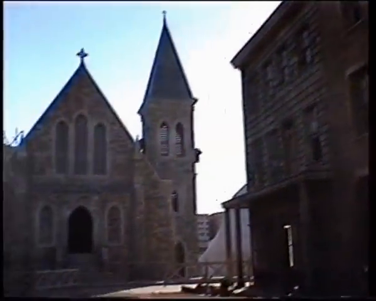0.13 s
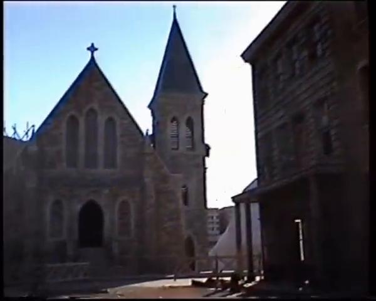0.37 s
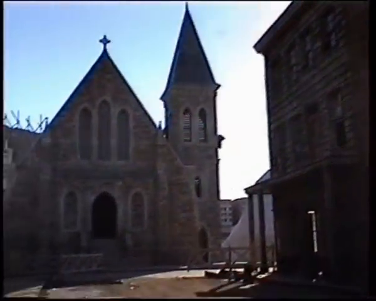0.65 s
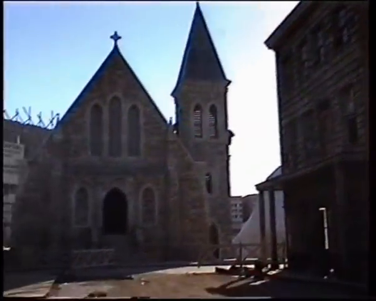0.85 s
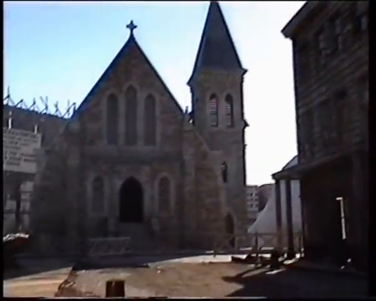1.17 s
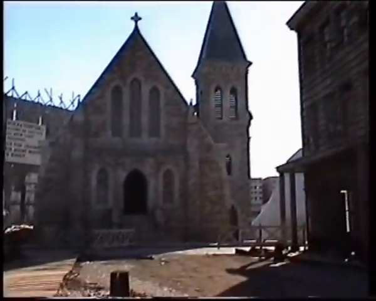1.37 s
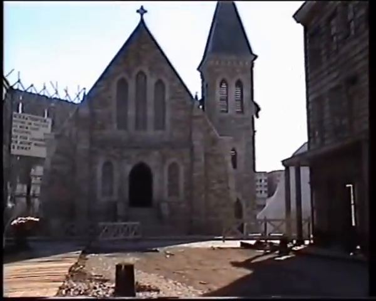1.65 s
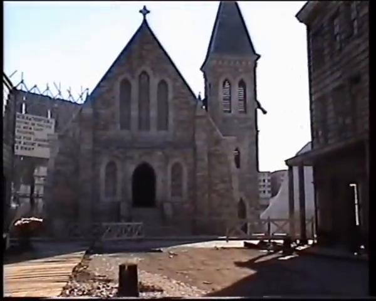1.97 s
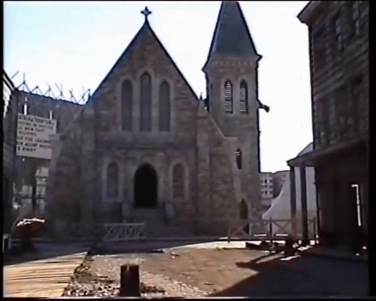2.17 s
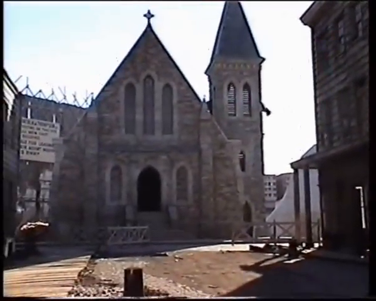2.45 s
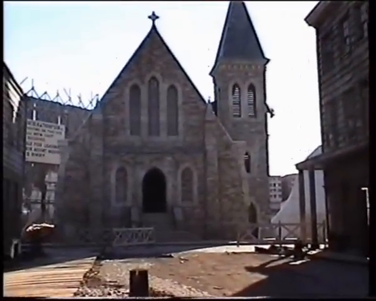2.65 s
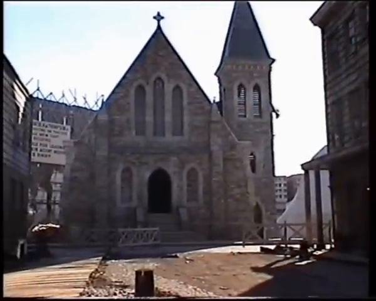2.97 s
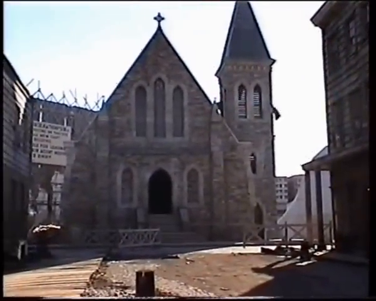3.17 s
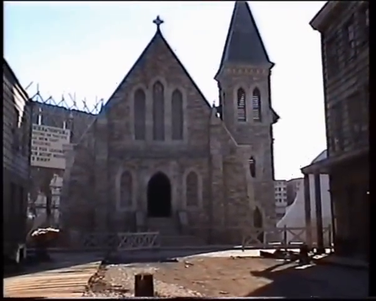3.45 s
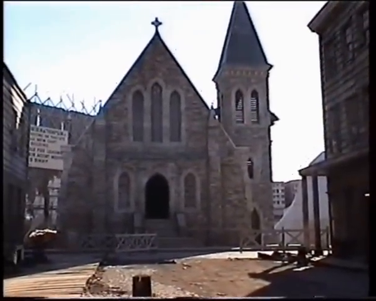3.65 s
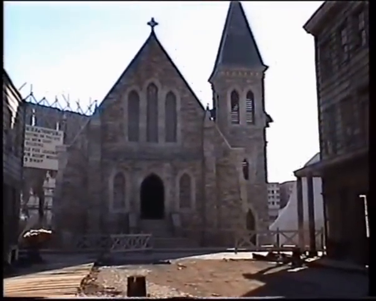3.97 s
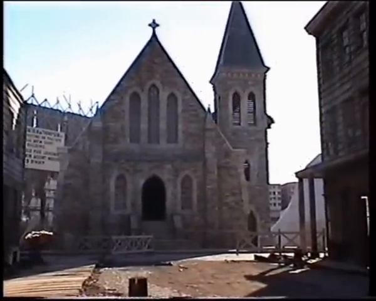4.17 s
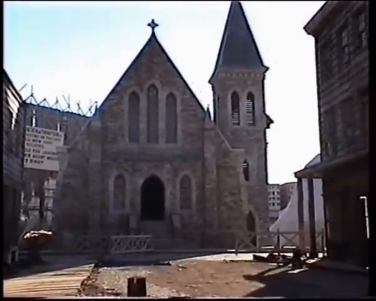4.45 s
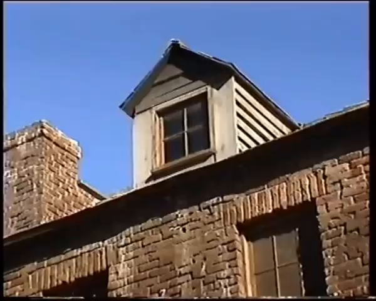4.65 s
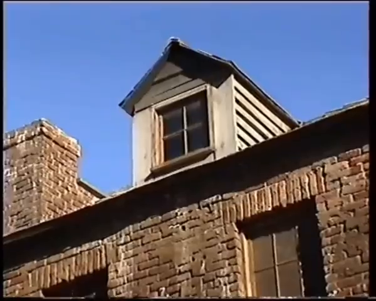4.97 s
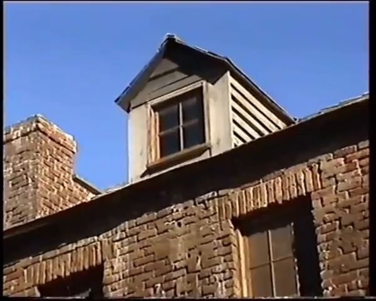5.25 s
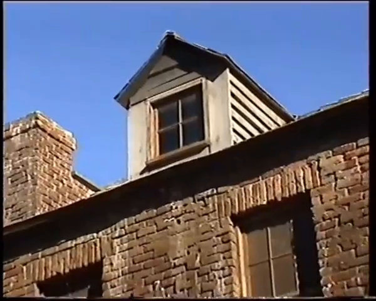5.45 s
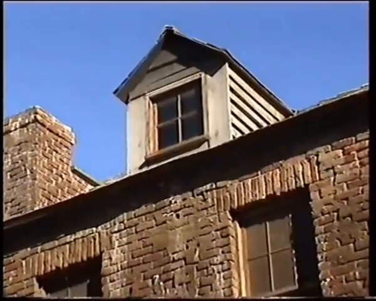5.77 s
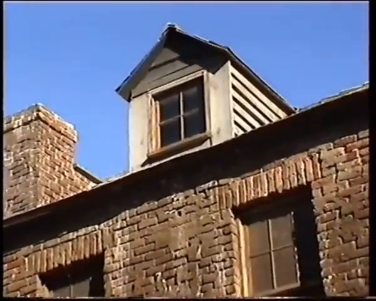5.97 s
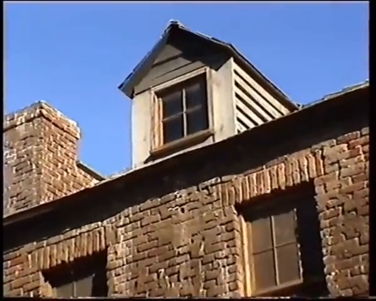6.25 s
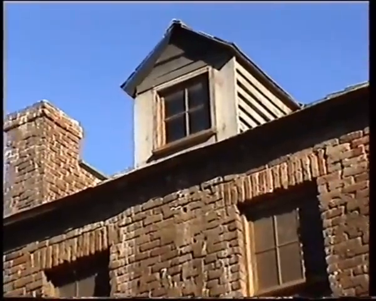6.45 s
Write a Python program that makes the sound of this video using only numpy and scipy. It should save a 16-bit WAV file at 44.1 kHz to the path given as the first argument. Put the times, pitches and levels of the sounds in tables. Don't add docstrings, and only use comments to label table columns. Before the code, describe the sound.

From 0 to 6.6 seconds a hard-edged electrical interference buzz runs without pause, pitch fixed near 217 hertz, rich in buzzy harmonics, slightly grainy and flickering, with tiny regular ticks of irregularity. It starts a little weaker and firms up by 1.3 seconds. It lies on the left; only thin, watery treble reaches the right. Under it is a faint distant outdoor hush. Wind makes low muffled bumps around 0.6 to 0.8 and 1.1 to 1.4 seconds, a small flutter at 2.3, puffs from 3.0 to 3.4, and a firmer knock and rumble at 3.6 to 3.9. At about 4.6 the scene cuts and the buzz changes colour. Gusts thicken, with pops at 5.35 to 5.6, then heavy overloading thumps at 5.8 to 6.0 and 6.15 to 6.3, briefly ducking the buzz. A last puff comes at 6.55. Close, dry, band-limited microphone, no echo.

```python
import sys
import numpy as np
from scipy import signal
from scipy.fft import rfft, irfft, dct, next_fast_len
from scipy.io import wavfile
from scipy.ndimage import uniform_filter1d, map_coordinates

SR = 44100
rng = np.random.default_rng(int(sys.argv[2]) if len(sys.argv) > 2 else 0)


def gain_from_db(level_db):
    decades = np.asarray(level_db, float) / 20
    return 10 ** decades


def dump_mix(stems):
    frames = np.atleast_2d(stems).T
    limited = np.clip(frames, -1, 1)
    pcm = np.round(limited * 32767).astype(np.int16)
    wavfile.write(sys.argv[1], SR, pcm)


N = 291879

SCENE_CHANGE_S = 4.625
FRAME_HZ = 650 / 3
SLOT_HZ = 8 * FRAME_HZ
GUARD = 0.052
GUST_RISE_DB_PER_S, GUST_FALL_DB_PER_S, SWAY_DB_PER_S = 700.5, 600, 351
SOFT_EDGE_DB = -19
BLOCK, OFFSET = 1024, 922

# f/Hz, density/dB
HUSH = [(60, -22.5), (150, -3), (400, -6.5), (900, -13), (1800, -6.5), (2600, -21.5), (3400, -43),
        (5000, -51.5)]
# f/Hz, density/dB
DEEP = [(12, -27), (20, -11), (30, 1), (42, 14), (55, -20), (70, -48)]
# f/Hz, density/dB
RUMBLE = [(45, -25), (62, -10), (90, 0.5), (130, 0), (200, -7), (285, -15.5), (400, -29.5), (600, -49)]
# f/Hz, density/dB
FLUTTER = [(120, -33), (200, -2), (300, 0), (450, -8.5), (800, -23), (1500, -27), (2200, -38.5),
           (3500, -60)]
# t/s, level/dB
BREEZE = [(0, -5), (0.45, 3.5), (1.0, 2), (1.5, -3), (2.0, 0), (2.7, -2), (3.0, 4), (3.25, -2), (3.5, 4.5),
          (4.15, 6), (4.4, -2), (4.6, 7.5), (5.7, 9), (6.1, 6), (6.62, 5)]
BREEZE_GROWS = (1, 0.8, 0.35)
CALM_DB = (-56.5, -50.5, -53)
# t/s, hold/s, rumble level/dB, flutter level/dB
GUSTS = [(0.55, 0.023, -49.5, -60), (0.653, 0.056, -38, -44), (0.773, 0.017, -37.5, -53),
         (1.115, .14, -34.5, -49), (1.293, .02, -41, -35), (1.346, 0.017, -39, -62),
         (1.433, 0.038, -56, -39), (2.298, 0.046, -54, -31.5), (2.988, 0.026, -44.5, -54),
         (3.364, .04, -39, -50), (3.635, 0.022, -27, -32), (3.724, .18, -33.5, -43.5),
         (3.987, 0.064, -39.5, -64), (4.191, 0.014, -37.5, -41), (4.279, 0.05, -43.5, -44),
         (4.56, 0.016, -41.5, -51), (4.652, 0.035, -33.5, -49), (4.74, .02, -39, -55),
         (4.83, 0.021, -37, -60), (5.018, 0.097, -34, -44), (5.209, 0.09, -38, -40),
         (5.327, 0.071, -37.5, -45), (5.506, 0.011, -30, -21.5), (5.574, .025, -34.5, -28),
         (5.726, 0.071, -36, -33), (5.847, 0.088, -24.5, -13), (5.984, .04, -39, -33),
         (6.148, 0.037, -27.5, -14), (6.202, .155, -35.5, -27.5), (6.543, 0.017, -32, -22.5)]
# t/s, level/dB
SWAYS = [(0.53, -45), (0.721, -41), (0.83, -45), (1.14, -31), (1.29, -39.5), (3.04, -42), (3.39, -41),
         (3.65, -24), (3.72, -32), (3.78, -35), (3.94, -39), (4.16, -47), (4.72, -32), (4.88, -38),
         (5.07, -33), (5.23, -41), (5.29, -39), (5.4, -36), (5.51, -45), (5.64, -32), (6.41, -41)]
# t/s, peak level/dB, f/Hz, length/s
PUFFS = [(1.088, -27, 116, 0.032), (1.238, -30, 146, 0.0074), (1.278, -31.5, 109, 0.037),
         (1.354, -51, 125, 0.023), (2.304, -44, 236, 0.021), (3.226, -28, 336, 0.007),
         (3.899, -28, 118, 0.014), (4.658, -32.5, 113, 0.018), (5.075, -30, 86, 0.032),
         (5.781, -18.5, 173, 0.019), (5.841, -8, 147.5, 0.026), (5.908, -9, 218, 0.013),
         (5.939, -18, 115, 0.0064), (5.983, -19.5, 161, 0.025), (5.988, -23, 221, 0.015),
         (6.022, -26, 240, 0.0077), (6.144, -10.5, 225, 0.025), (6.177, -18, 209, 0.031),
         (6.192, -25, 258, 0.018), (6.302, -24.5, 283, 0.025), (6.544, -19.5, 283, 0.009)]
# t/s, peak level/dB, f/Hz, length/s, edge level/dB
POPS = [(3.634, -24, 87, 0.033, -8), (3.76, -28, 78.4, 0.013, -3), (5.351, -26.5, 220, 0.0069, -14),
        (5.401, -19, 215, 0.012, -15), (5.506, -17.5, 262, 0.0089, -7), (5.591, -21, 265, 0.0064, 3),
        (5.815, -12.5, 223, 0.016, -7), (5.856, -14, 234, 0.0099, -12), (5.887, -25, 260, 0.018, -9),
        (6.142, -12, 384, 0.0088, 0.5), (6.278, -15.5, 316, 0.0076, -3)]
# t/s, level/dB
PICKUP = [(0, -4), (0.55, -3.5), (1.3, 0.16), (2.6, 0.04), (3.6, 0.5), (4.1, -1.5), (4.6, -1.35),
          (5.3, 0.1), (6.0, 0.1), (6.62, 0.3)]
# start, early, late, end level/dB
FIRST_SLOTS = [(-24, -26, -27, -24), (-34.5, -30, -28, -27.5), (-31, -29, -31, -32.5),
               (-25.5, -25, -25.5, -28.5), (-22.5, -23.5, -24, -22.5), (-27.5, -24.5, -24, -25),
               (-34, -45.5, -41, -34), (-23.5, -23.5, -23.5, -24.5)]
# start, middle, end level/dB
SECOND_SLOTS = [(-36, -41, -28.5), (-25.5, -28, -30.5), (-21, -20.5, -22), (-25.5, -26, -25),
                (-28.5, -24, -24), (-21, -25.5, -26.5), (-22, -22, -20.5), (-26, -31.5, -22)]
SIGNALLING = [79, 9]
# from t/s, to t/s, above f/Hz
LEAK = [
    (0, 4.65, 2320),
    (4.65, 5.435, 4020),
    (5.435, 7, 2320),
]
JOLTS = [
    4.64,
    5.43,
    5.92,
    6.15,
    6.29,
]
BANDS = [0, 40, 56, 72, 88, 96, 108, 120, 132, 144, 164, 176, 196, 224, 232, 237, 246, 264, 269, 292, 320,
         326]
STEP_DB = [-54, -47, -47, -48, -48, -48, -47, -44, -45, -47, -38, -46, -46, -38, -36, -46, -36, -33, -46,
           -45, -42]


def unit(x):
    return x / np.sqrt(np.mean(x ** 2) + 1e-20)


def curves(rows, s):
    t, *columns = np.transpose(rows)
    return np.array([np.interp(s, t, column) for column in columns])


def wobble(rate):
    knots = rng.standard_normal(int(N * rate / SR) + 4)
    return map_coordinates(knots, [np.arange(N) * rate / SR])


def filtered(x, response):
    m = next_fast_len(len(x) + 8192)
    return irfft(rfft(x, m) * response(np.fft.rfftfreq(m, 1 / SR)), m)[:len(x)]


def noise(spectrum):
    f, db = np.transpose(spectrum)

    def colour(hz):
        return gain_from_db(np.interp(np.log(hz + 1), np.log(f), db, -120, -120))

    return unit(filtered(rng.standard_normal(N), colour))


def hush():
    return gain_from_db(-51) * noise(HUSH)


def swells(layer, start, hold, db, rise, fall):
    t = np.arange(0, N + 64, 64) / SR
    calm_db = CALM_DB[layer] + BREEZE_GROWS[layer] * curves(BREEZE, t)[0]
    late = t - start[:, None]
    rising_db = rise * np.minimum(late, 0)
    falling_db = -fall * np.maximum(late - hold[:, None], 0)
    shape_db = db[:, None] + rising_db + falling_db
    gain = np.sqrt(gain_from_db(calm_db) ** 2 + np.sum(gain_from_db(shape_db) ** 2, 0))
    return np.interp(np.arange(N) / SR, t, gain)


def wind():
    s, hold, rumble_db, flutter_db = np.transpose(GUSTS)
    sway_s, sway_db = np.transpose(SWAYS)
    lumps = wobble(35)
    rumble = unit(gain_from_db(lumps) * noise(RUMBLE))
    flutter = unit(gain_from_db(2.3 * lumps + 1.8 * wobble(70)) * noise(FLUTTER))
    deep = swells(0, sway_s, 0 * sway_s, sway_db, SWAY_DB_PER_S, SWAY_DB_PER_S) * noise(DEEP)
    rumble = swells(1, s, hold, rumble_db, GUST_RISE_DB_PER_S, GUST_FALL_DB_PER_S) * rumble
    flutter = swells(2, s, hold, flutter_db, GUST_RISE_DB_PER_S, GUST_FALL_DB_PER_S) * flutter
    return deep + gain_from_db(3) * rumble + gain_from_db(-6) * flutter


def puffs():
    out, t = np.zeros(N + SR), np.arange(SR // 8) / SR
    soft = [(*puff, SOFT_EDGE_DB) for puff in PUFFS]
    for s, db, hz, length, edge_db in [*soft, *POPS]:
        cycles = hz * (t + 0.001 * (1 - np.exp(-t / 0.0017)))
        envelope = np.sin(np.pi * np.clip(t / length, 0, 1) ** 0.62)
        swing = np.sin(2 * np.pi * cycles) * envelope
        u = (t - .005) / 0.00035
        edge = gain_from_db(edge_db) * np.tanh(4 * u) * np.exp(-np.abs(u))
        out[round(s * SR):][:len(t)] += gain_from_db(db + 1.5) * (edge - swing)
    return filtered(out[:N], lambda hz: (1j * hz / (60 + 1j * hz)) ** 2)


def mast(scatter, scatter_db, signalling, drift, coupling_hz):
    clock = SLOT_HZ * np.arange(N) / SR + .25 + drift * wobble(2)
    n = np.arange(int(clock.max()) + 2)
    s = n / SLOT_HZ
    knots = np.r_[np.linspace(0, SCENE_CHANGE_S, 4), np.linspace(SCENE_CHANGE_S, N / SR, 3)]
    fades = [np.interp(s, knots, row) for row in np.c_[FIRST_SLOTS, SECOND_SLOTS]]
    slot_db = np.array(fades)[n % 8, n]
    steady = gain_from_db(slot_db + curves(PICKUP, s)[0])
    strength = steady * (1 + scatter * rng.standard_normal(len(n)))
    strength = strength + gain_from_db(scatter_db) * rng.standard_normal(len(n))
    place = (n - np.where(s < SCENE_CHANGE_S, *SIGNALLING)) % 208
    turn = (place < 8) * 1. - ((place >= 104) & (place < 112))
    strength = strength + signalling * steady * turn * (-1.) ** n
    edges = np.stack([n + GUARD / 2, n + 1 - GUARD / 2], 1).ravel()
    area = np.cumsum(np.stack([0 * strength, strength * (1 - GUARD)], 1).ravel())
    steps = np.gradient(np.interp(clock, edges, area)) / np.gradient(clock)
    return filtered(steps - steps.mean(), lambda hz: 1j * hz / (coupling_hz + 1j * hz))


def scene():
    gusts = wind() + puffs()
    buzz = mast(scatter=0.22, scatter_db=-40.0, signalling=0.32, drift=0.09, coupling_hz=246)
    steady = buzz + hush()
    release = np.exp(-np.arange(SR // 8) / (0.0047 * SR))
    power = signal.fftconvolve(gusts ** 2, release / release.sum())[:N]
    loudness = np.sqrt(np.abs(power))
    lead = gusts + steady / (1 + loudness / 0.35)
    return np.array([lead, lead])


def lapped(x):
    blocks = np.pad(x, (2 * BLOCK - OFFSET, 3 * BLOCK))[:(N // BLOCK + 4) * BLOCK].reshape(-1, BLOCK)
    windowed = np.c_[blocks[:-1], blocks[1:]] * signal.windows.cosine(2 * BLOCK)
    a, b, c, d = np.split(windowed, 4, axis=1)
    return dct(np.c_[-c[:, ::-1] - d, a - b[:, ::-1]], 4, norm="ortho")


def unlapped(z):
    p, q = np.split(dct(z, 4, norm="ortho"), 2, axis=1)
    full = np.c_[q, -q[:, ::-1], -p[:, ::-1], -p] * signal.windows.cosine(2 * BLOCK)
    return (full[1:, :BLOCK] + full[:-1, BLOCK:]).ravel()[BLOCK - OFFSET:][:N]


def band_limit(x):
    return signal.sosfilt(signal.butter(12, 7720, fs=SR, output="sos"), x)


def record(dry):
    z = lapped(dry[0])
    hz = (np.arange(BLOCK) + .5) * SR / (2 * BLOCK)
    s = ((np.arange(len(z)) - 1) * BLOCK + OFFSET) / SR
    jolt = np.abs(s[:, None] - np.array(JOLTS)).min(1)[:, None] < .025
    load_db = 10 * np.log10(np.mean(z ** 2, 1, keepdims=True) + 1e-9) + 34
    starved_db = 2.5 * (s > SCENE_CHANGE_S)[:, None] * (np.array(BANDS[1:]) > 150)
    flicker_db = 2.8 * rng.standard_normal((len(z), len(STEP_DB)))
    step_db = np.array(STEP_DB) + starved_db + 0.46 * load_db + flicker_db
    step = gain_from_db(np.repeat(step_db, np.diff(BANDS), axis=1))
    local = np.exp(uniform_filter1d(np.log(np.abs(z) + 1e-9), size=7, axis=1))
    blur = np.clip(hz / 3000, 0, 1)
    z = z + blur * local * rng.standard_normal(z.shape)
    patches = uniform_filter1d(rng.standard_normal(z.shape), size=3, axis=0)
    patches = unit(uniform_filter1d(patches, size=5, axis=1))
    z = z * ~((patches > .8) & (np.abs(z) < 4 * local) & (hz > 1500))
    kept = z[:, :BANDS[-1]]
    whole_steps = np.floor((np.abs(kept) / step) ** .75 + .4054)
    rounded = np.zeros_like(z)
    rounded[:, :BANDS[-1]] = np.sign(kept) * step * whole_steps ** (4 / 3)
    top = np.where(hz > 7020, gain_from_db(-11) * (hz < 7600), 1)
    z = np.where(jolt, z * top, rounded)
    shared = sum(np.outer((s >= t0) & (s < t1), hz > above) for t0, t1, above in LEAK)
    left = z * gain_from_db(-.6 * shared)
    right = z * np.where(shared, gain_from_db(-8.5), gain_from_db(-50.5))
    return band_limit(np.array([unlapped(left), unlapped(right)]))


dry = scene()
out = record(dry)
dump_mix(out)
```